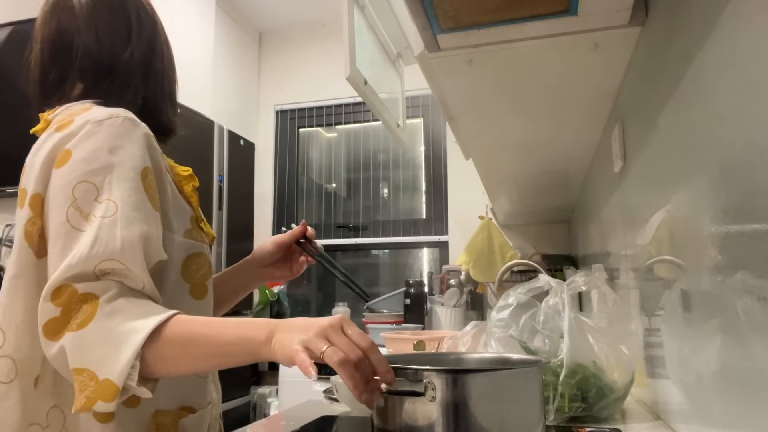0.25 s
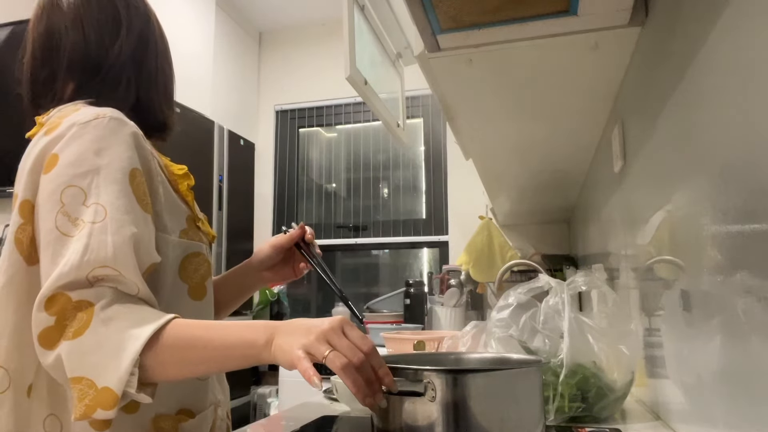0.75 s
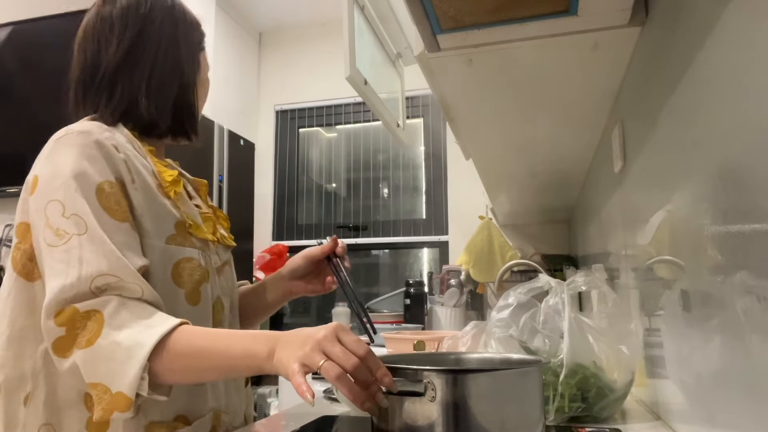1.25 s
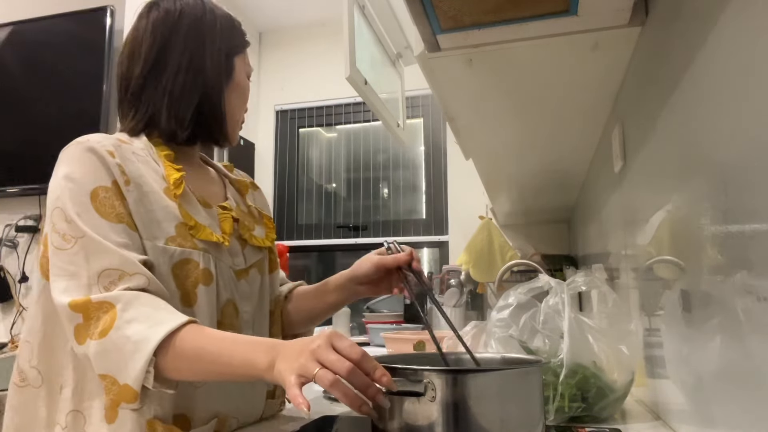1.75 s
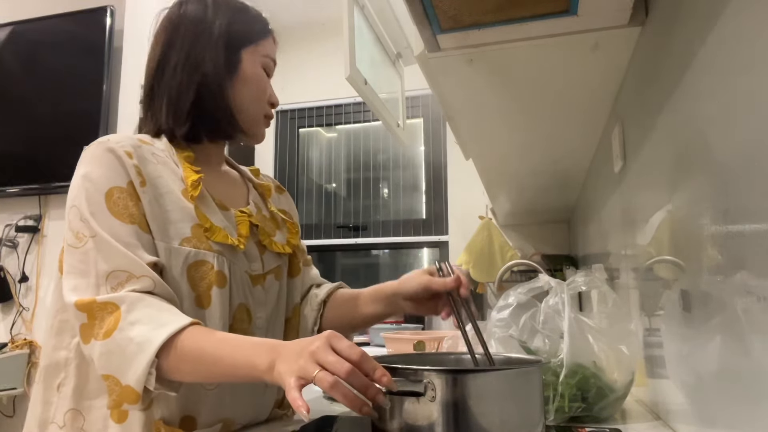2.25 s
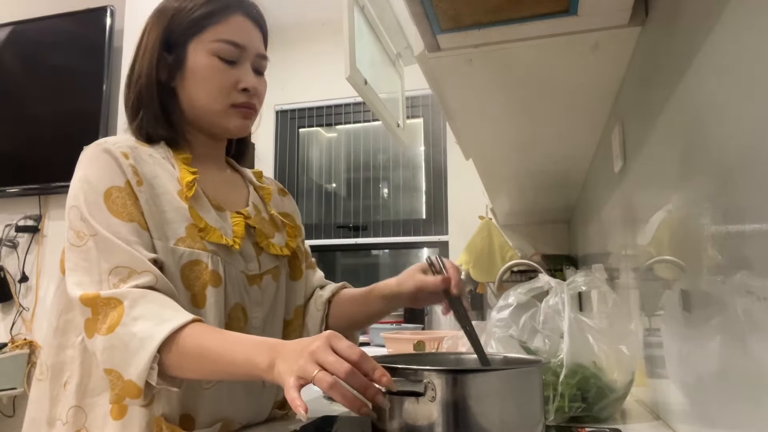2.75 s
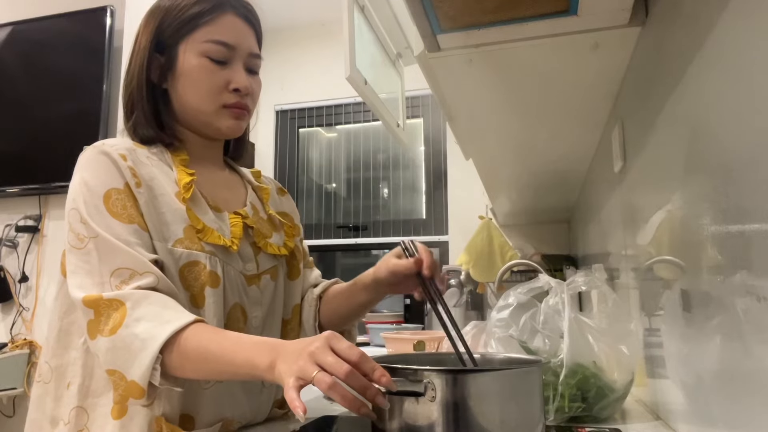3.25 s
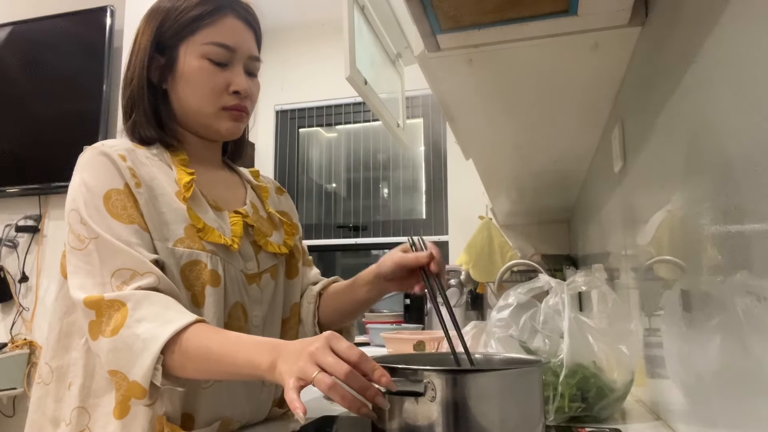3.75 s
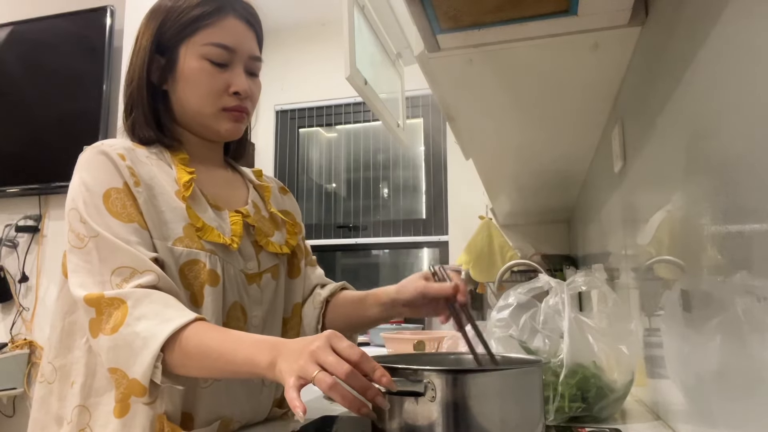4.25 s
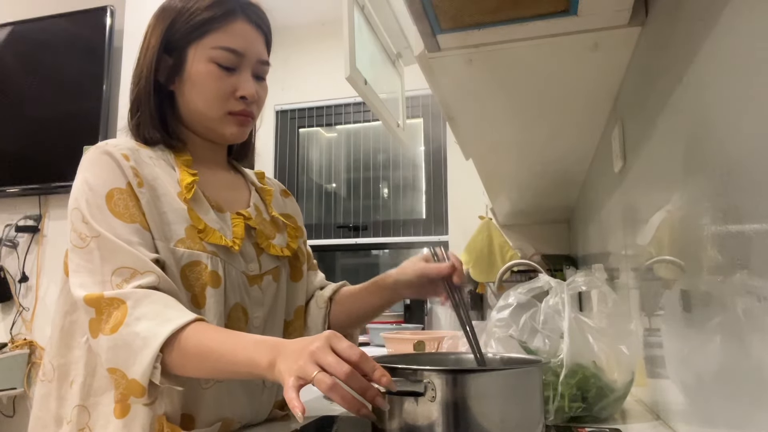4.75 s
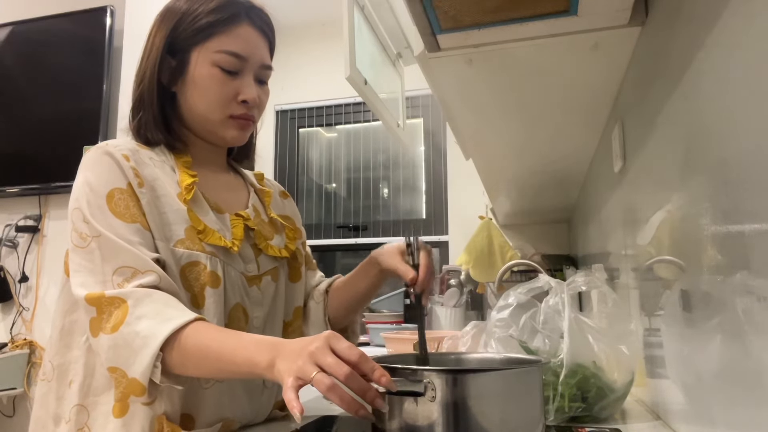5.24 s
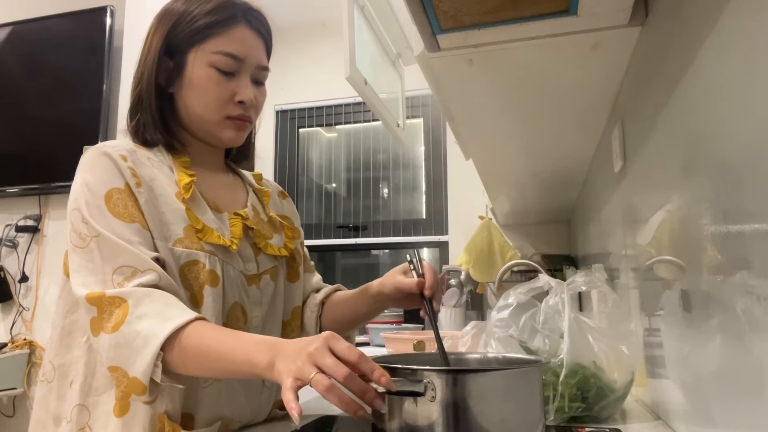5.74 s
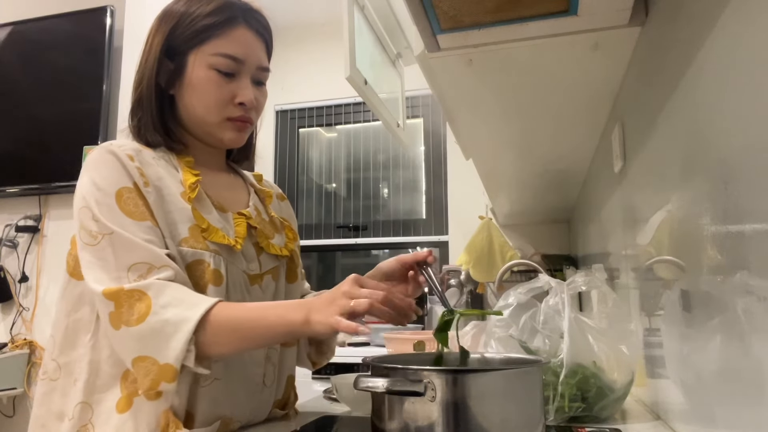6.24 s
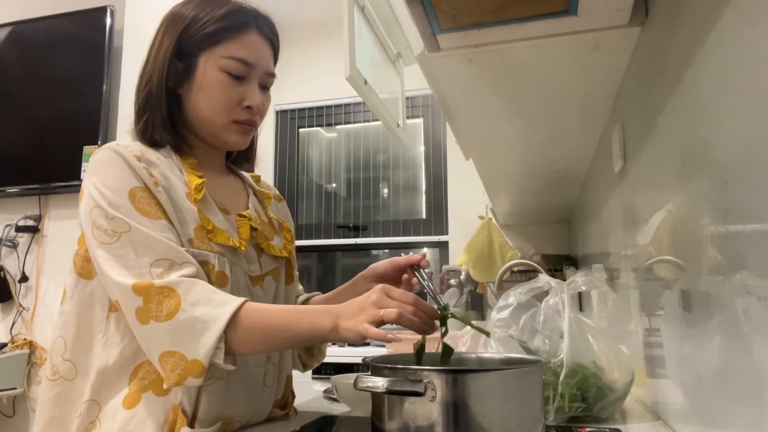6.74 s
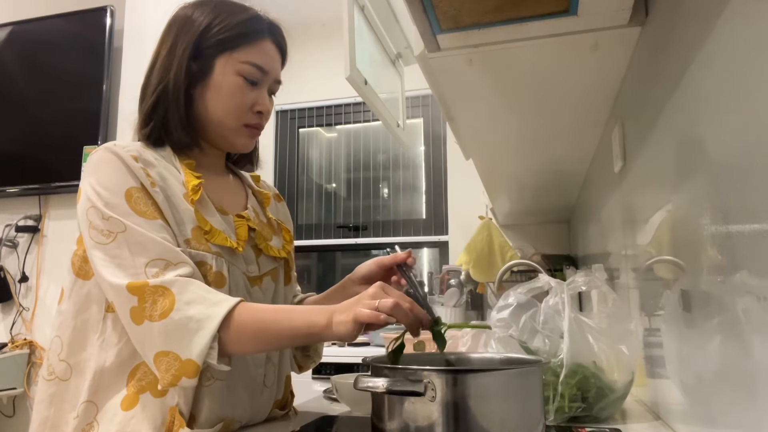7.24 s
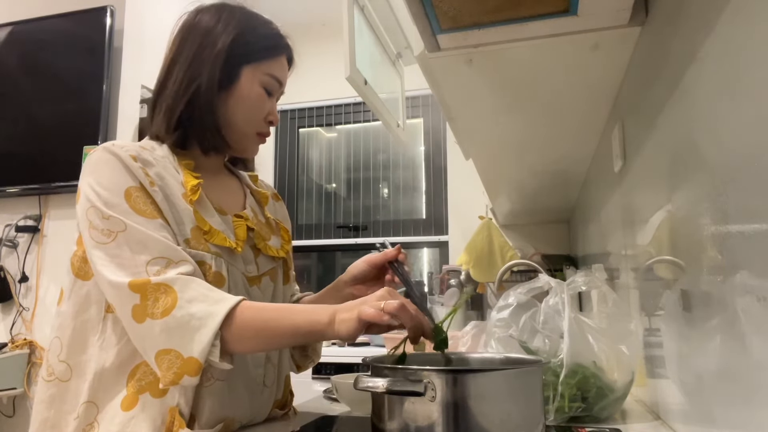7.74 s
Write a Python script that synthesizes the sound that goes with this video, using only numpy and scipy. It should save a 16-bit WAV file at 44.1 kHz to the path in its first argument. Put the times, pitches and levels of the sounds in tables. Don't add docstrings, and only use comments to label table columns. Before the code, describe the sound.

A loud, low, steady hum from an electric hob fills a small hard-walled kitchen, swelling slightly and easing. Beneath it a steel pot simmers with tiny bubbling notes and a soft fan rush. Chopsticks knock dully in the broth throughout, with a soft clink at two seconds, a sharp one near three and a half, and bright rim hits around five. Close stereo microphone near the stove.

```python
import sys
import numpy as np
from scipy import signal
from scipy.fft import rfft, irfft, next_fast_len
from scipy.io import wavfile

SR = 44100
rng = np.random.default_rng(int(sys.argv[2]) if len(sys.argv) > 2 else 0)


def generate_wav(sig):
    pcm = np.round(np.clip(np.atleast_2d(sig).T, -1, 1) * 32767).astype(np.int16)
    wavfile.write(sys.argv[1], SR, pcm)


def field_ratio(decibels):
    return 10 ** (np.asarray(decibels, dtype=float) / 20)


N = 352342

HUM_HZ = 100.252
WALL_HZ, BELLY_HZ, RIM_HZ = 494, 625, 988
SIZE = next_fast_len(N + SR // 2)
FREQS = np.arange(SIZE // 2 + 1) * SR / SIZE + 1e-3
# [t/s, rush change/dB, bubbles per second]
STIR = [(0, 0, 156), (.4, 0.5, 124), (1, 0.5, 186), (1.6, 0, 165), (2.2, 1, 380), (2.9, 0, 200),
        (3.6, 1.5, 200), (4.2, -0.5, 116), (4.9, 0, 100), (5.5, 0.5, 66), (6.2, 0, 224), (6.7, -.5, 95),
        (7.2, -0.5, 264), (7.99, 0, 160)]


def at_hz(points, column=1):
    rows = np.array(points)
    return np.interp(np.log(FREQS), np.log(rows[:, 0]), rows[:, column])


def in_time(rows, size=N):
    s, *columns = np.transpose(rows)
    return [np.interp(np.arange(size) / SR, s, c) for c in columns]


def drift(rate_hz):
    hop, settle = 40, 4000
    r = np.exp(-2 * np.pi * rate_hz * hop / SR)
    noise = rng.standard_normal(SIZE // hop + settle + 2)
    slow = signal.lfilter([1], [1, -2 * r, r * r], noise)[settle:]
    return np.interp(np.arange(SIZE) / hop, np.arange(len(slow)), slow / slow.std())


def ring(clicks, hz, t60):
    r, w = field_ratio(-60 / (t60 * SR)), 2 * np.pi * hz / SR
    return signal.lfilter([0, np.sin(w)], [1, -2 * r * np.cos(w), r * r], clicks + 1e-18)


def struck(hz, t60, size, lag):
    t = np.arange(size) / SR
    envelope = field_ratio(-60 * t / t60) * (1 - np.exp(-t / .0012))
    return envelope * np.sin(2 * np.pi * hz * t + [[0], [lag]])


def burst(noise, rise_s, t60, low_hz, high_hz):
    t = np.arange(noise.shape[1]) / SR
    shape = field_ratio(-60 * t / t60) * (1 - np.exp(-t / rise_s))
    band = signal.butter(2, [low_hz, high_hz], "band", fs=SR, output="sos")
    return signal.sosfilt(band, noise * shape)


def add(out, s, sound):
    at = round(s * SR)
    out[:, at:at + sound.shape[1]] += sound


def hum():
    # [t/s, rms level/dB, left-right/dB]
    hum_curve = [(0, -16.8, -.2), (.5, -18, -.2), (1.25, -19.3, -.2), (1.6, -20.7, -.3), (2.0, -19.7, -.2),
                 (2.45, -18.8, -.3), (3.15, -19.6, -.3), (3.5, -21, -.4), (4.2, -21.5, -.4),
                 (4.95, -20, -.3), (5.4, -20.3, -.3), (5.8, -19.3, -.1), (6.05, -17, .1), (6.8, -18, .1),
                 (7.45, -17.3, 0), (7.99, -17.6, 0)]
    # [multiple of the hum, left rms level/dB, right rms level/dB, right lead/rad]
    overtones = [(2, -52, -54, 0.64), (3, -52.5, -52, -0.75), (4, -55, -54, -1), (5, -63, -59.5, 2.2),
                 (6, -58.5, -64.5, 2), (7, -70, -82, -18), (8, -66, -67, 3.5)]
    turn = 2 * np.pi * HUM_HZ * np.arange(N) / SR + .85
    level_db, lean_db = in_time(hum_curve)
    out = field_ratio(level_db + lean_db * [[.5], [-.5]]) * np.cos(turn + [[-.06], [.06]])
    sway = drift(4.9)[:N]
    for k, left_db, right_db, lead in overtones:
        wobble = field_ratio(4.04 * drift(3.7)[:N])
        level = wobble * field_ratio(np.array([[left_db], [right_db]]))
        phase = k * turn + rng.uniform(0, 6.2) + 0.11 * k * sway
        out = out + level * np.cos(phase + [[0], [lead]])
    return np.sqrt(2) * out


def clinks():
    # [t/s, crack level/dB, steel level/dB, stick note f/Hz, low ring level/dB]
    clink_events = [
        (1.998, -31, -35.5, 3400, -53),
        (3.4469, -24, -34, 2950, -55),
        (4.9887, -20, -20, 3470, -43),
        (5.195, -18, -19.5, 3600, -31),
        (5.2094, -27.5, -28, 3340, -32),
    ]
    # [f/Hz, level/dB, t60/s]
    low_ring = [(990, -14, .1), (1234, -3, .09), (1308, -1, .14), (1564, -1, .06), (1868, -10, .08),
                (2150, -9, .06)]
    # [f/Hz, level/dB, t60/s]
    high_ring = [(3030, -16, .1), (3195, -16, .1), (3340, -17, .12), (3390, -15, .2), (3470, -17, .08),
                 (3800, -15, .14), (3975, -17, .15), (5445, -19, .15), (5860, -14, .15), (6035, -13, .16),
                 (6260, -14, .12), (6770, -17, .12), (7410, -16, .08), (7480, -13, .15), (7980, -15, .1),
                 (8199, -3, .15), (9030, -13, .08)]
    out, size = np.zeros((2, SIZE)), SR // 3
    for s, crack_db, sizzle_db, stick_hz, low_db in clink_events:
        noise = rng.standard_normal((2, size))
        crack = field_ratio(crack_db + 4) * burst(noise, 0.00047, 0.039, 720, 8100)
        stick = burst(noise[::-1], 0.00027, 0.012, 0.93 * stick_hz, 1.06 * stick_hz)
        sizzle = field_ratio(sizzle_db) * burst(noise, 0.00048, 0.023, 4800, 16600)
        sound = crack + field_ratio(crack_db + 13.5) * stick + sizzle
        for family_db, modes in ((low_db, low_ring), (sizzle_db - 4.5, high_ring)):
            for hz, db, t60 in modes:
                level = field_ratio(family_db + db - 1.0 + 0.66 * rng.standard_normal())
                sound += level * struck(hz, t60, size, lag=rng.uniform(0, 2 * np.pi))
        add(out, s, sound)
    return out


def thuds():
    # [t/s, peak level/dB, f/Hz]
    thud_events = [(.48, -31, 520), (.484, -34.5, 1580), (1.998, -28.5, 2700), (1.999, -33.5, 1140),
                   (2.006, -22, 237), (2.199, -34, 435), (1.999, -35, 3380), (3.449, -24.5, 3190),
                   (3.453, -29, 2520), (3.459, -40, 2900), (2.002, -29, 508), (4.989, -36, 222),
                   (4.989, -38, 1510), (4.989, -33, 3440), (5.196, -39, 790), (4.99, -33, 664),
                   (5.2, -29, 289)]
    out, size = np.zeros((2, SIZE)), SR // 4
    for s, db, hz in thud_events:
        rise_s, t60 = 0.00051 + 0.93 / hz, 0.033 + 16.5 / hz
        swell = 1 - np.exp(-np.arange(size) / SR / rise_s)
        add(out, s, field_ratio(db) * swell * struck(hz, t60, size, lag=0.14))
    return out


def knocks():
    # [t/s, peak level/dB, note struck f/Hz, slosh against note/dB]
    knock_events = [(0.1, -30.5, WALL_HZ, -3), (0.478, -24, RIM_HZ, -5.5), (0.598, -39, WALL_HZ, 4),
                    (0.744, -36, BELLY_HZ, -6), (1.01, -35, BELLY_HZ, -4), (1.082, -34, RIM_HZ, -7),
                    (1.174, -36, WALL_HZ, 1), (1.27, -36.5, BELLY_HZ, 3.5), (1.387, -30, WALL_HZ, -10),
                    (1.872, -38, BELLY_HZ, 1), (1.999, -28.5, BELLY_HZ, 1), (2.368, -44, WALL_HZ, 10),
                    (2.507, -31.5, WALL_HZ, 4), (2.659, -37, WALL_HZ, 2), (2.699, -33.5, WALL_HZ, -0.5),
                    (2.787, -40, RIM_HZ, 8), (2.932, -34, BELLY_HZ, -5), (2.987, -43, BELLY_HZ, 3),
                    (3.287, -32.5, BELLY_HZ, 1), (3.447, -35.5, BELLY_HZ, 6), (3.592, -26.5, BELLY_HZ, -9),
                    (4.155, -36, BELLY_HZ, 4), (4.314, -26, WALL_HZ, -11), (4.415, -41, BELLY_HZ, 7),
                    (4.719, -34, BELLY_HZ, -3), (5.868, -32, BELLY_HZ, -22), (6.751, -41, WALL_HZ, 2),
                    (7.147, -32, BELLY_HZ, -3), (7.305, -32.5, BELLY_HZ, -4), (7.797, -29, WALL_HZ, -4)]
    out, size = np.zeros((2, SIZE)), SR // 10
    for s, db, hz, slosh_db in knock_events:
        splash = burst(rng.standard_normal((2, size)), 0.0017, 0.06, 350, 2670)
        slosh = field_ratio(slosh_db + 13.0) * signal.lfilter([.07], [1, -1.47, .54], splash)
        add(out, s, field_ratio(db - 3.0) * (struck(hz, 0.055, size, lag=1.6) + slosh))
    return out


def ticks():
    # [t/s, peak level/dB, f/Hz]
    tick_events = [(0.11, -39, 3770), (1.185, -41, 6040), (1.5354, -48, 3770), (2.6579, -43, 3950),
                   (2.819, -46, 3940), (2.8729, -43, 3630), (2.9333, -42, 6060), (3.398, -37, 4960),
                   (4.6174, -43, 3500), (5.7418, -46, 4050), (6.6654, -42, 3930)]
    out, size = np.zeros((2, SIZE)), SR // 10
    for s, db, hz in tick_events:
        scratch = burst(rng.standard_normal((2, size)), 0.0018, 0.05, 0.79 * hz, 1.48 * hz)
        add(out, s, field_ratio(db + 8) * scratch)
    return out


def simmer(level_db, spread_db, cycles, pop_db):
    # [f/Hz, level/dB]
    bubble_notes = [(330, -10.5), (420, -1), (500, -2), (590, -4.5), (660, -3), (780, -1.5), (990, -2.5),
                    (1060, -15), (1310, -10), (1560, -10), (2100, -11)]
    _, per_s = in_time(STIR, size=SIZE)
    sizes = field_ratio(spread_db * np.minimum(rng.exponential(1, SIZE), 2.2)) * rng.choice([-1, 1], SIZE)
    chance = per_s * field_ratio(6.0 * drift(10.5)) / SR
    born = sizes * (rng.random(SIZE) < chance)
    dealt = rng.integers(0, len(bubble_notes), SIZE)
    out = field_ratio(pop_db) * ring(ring(born, 357, 0.0088), 550, 0.0095) / 20
    for k, (hz, db) in enumerate(bubble_notes):
        out = out + ring(born * (dealt == k) * field_ratio(db), hz, cycles / hz)
    return field_ratio(level_db) * np.array([out, np.roll(out, shift=20)])


def air(patchy_db, buzz):
    # [f/Hz, level per Hz/dB]
    rumble = [(15, -80), (30, -87), (40, -64.5), (60, -56.5), (80, -60), (92, -54), (110, -51), (125, -58),
              (140, -61.5), (170, -67.5), (230, -66.5), (270, -67.5), (350, -72.5), (500, -77.5)]
    # [f/Hz, level per Hz/dB]
    rush = [(300, -86), (500, -76), (800, -78.5), (1500, -83.5), (2400, -85.5), (2900, -90), (4300, -92.5),
            (6000, -92.5), (7500, -92.5), (9000, -91.5), (10000, -95.5), (11500, -98), (15500, -99),
            (16000, -99)]
    # [f/Hz, width/Hz, level/dB]
    pot_air = [(660, 45, 6.5), (990, 70, 7), (1306, 50, 3), (2637, 100, 4.5), (3340, 240, 5.5),
               (3990, 120, 3.5), (10400, 300, 3)]
    power = field_ratio(2 * at_hz(rumble)) * (FREQS < 500) + field_ratio(2 * at_hz(rush)) * (FREQS > 300)
    colour_db = sum(db / (1 + (2 * (FREQS - hz) / width) ** 2) for hz, width, db in pot_air)
    shaped = rfft(rng.standard_normal((2, SIZE))) * np.sqrt(power * SR / 2) * field_ratio(colour_db)
    change_db, _ = in_time(STIR, size=SIZE)
    together, out = drift(27.0), 0
    chop = np.cos(2 * np.pi * HUM_HZ * np.arange(SIZE) / SR)
    centres = np.array([80, 250, 600, 1300, 3000, 7000, 13000])
    for centre, pick in zip(centres, np.eye(len(centres))):
        share = np.interp(np.log(FREQS), np.log(centres), pick)
        flicker_db = patchy_db * (.5 * together + 0.36 * drift(21))
        gain = field_ratio(flicker_db + change_db * (centre > 200))
        chopped = 1 + buzz * chop * (centre > 4000)
        out = out + gain * chopped * irfft(shaped * share, SIZE)
    return out


def kitchen(pair):
    t60, level_db = 0.37, -10
    t = np.arange(SR // 3) / SR
    tail = rng.standard_normal((2, len(t))) * field_ratio(-60 * t / t60) * np.clip(t / 0.0047, 0, 1)
    tail = signal.lfilter([1], [1, -.4], tail)
    tail = tail / np.sqrt(np.sum(tail ** 2, axis=1, keepdims=True))
    return pair + field_ratio(level_db) * irfft(rfft(pair, SIZE) * rfft(tail, SIZE), SIZE)


def ports(pair):
    # [f/Hz, likeness 0-1, right lead/rad, left-right/dB]
    port_curve = [(150, .99, .1, 0), (240, .76, 0, 0), (500, .5, .4, .5), (900, .55, 1.3, -4),
                  (2000, .25, -2.2, -1), (3100, .65, -.3, -.5), (6000, .33, 3.4, 2.5), (7100, .76, 2.9, 1),
                  (8600, .85, 3.4, .3), (10700, .97, 5.7, 0), (12900, .97, 6.85, 0), (14850, .995, 9.42, 0)]
    first, twin = rfft(pair, SIZE)
    alike = np.clip(at_hz(port_curve, column=1), 0, 1)
    shifted = np.exp(1j * at_hz(port_curve, column=2)) * first
    right = alike * shifted + np.sqrt(1 - alike ** 2) * twin
    tilt = field_ratio(at_hz(port_curve, column=3) / 2)
    return irfft([first * tilt, right / tilt], SIZE)[:, :N]


def scene():
    contacts = clinks() + knocks() + ticks()
    bubbles = simmer(level_db=-48, spread_db=5.5, cycles=21.3, pop_db=2)
    pot = kitchen(bubbles + contacts) + thuds()
    return hum() + ports(air(patchy_db=2.0, buzz=0.11) + pot)


def roll_off(x):
    return signal.sosfilt(signal.butter(12, 15780, fs=SR, output="sos"), x)


def record(dry):
    return roll_off(dry)


dry = scene()
out = record(dry)
generate_wav(out)
```